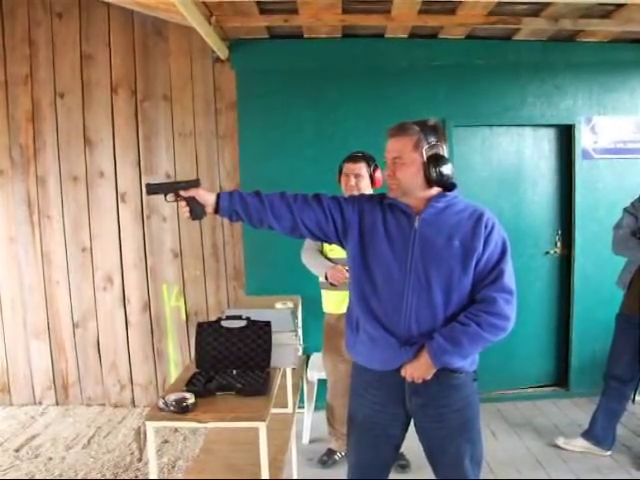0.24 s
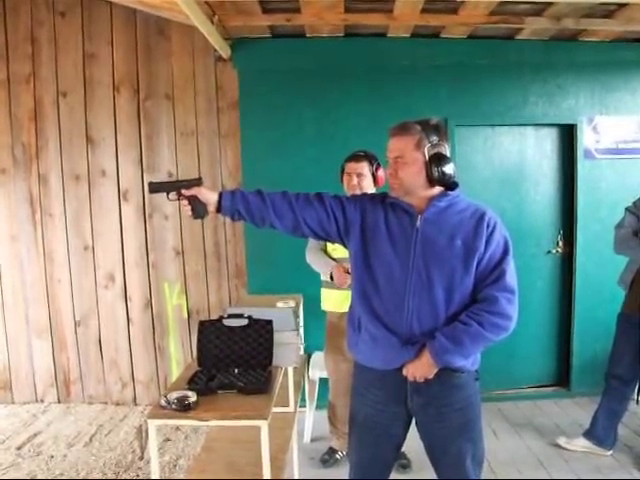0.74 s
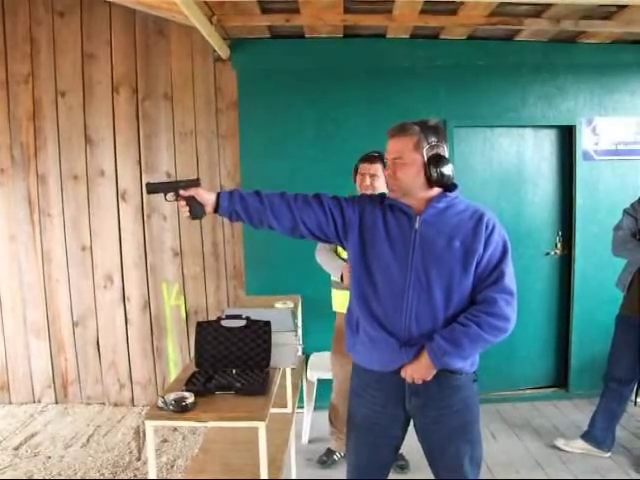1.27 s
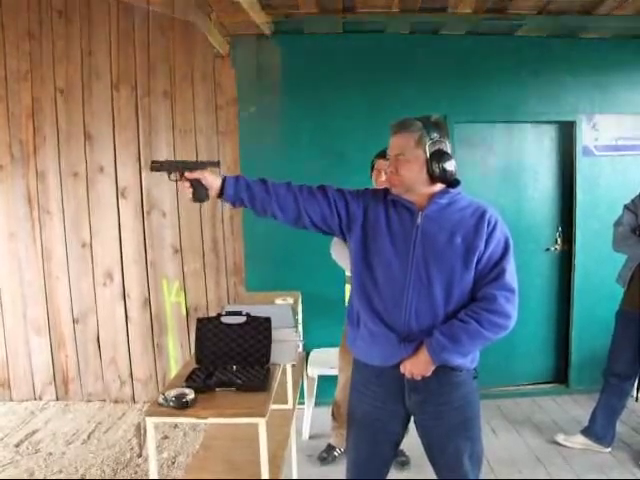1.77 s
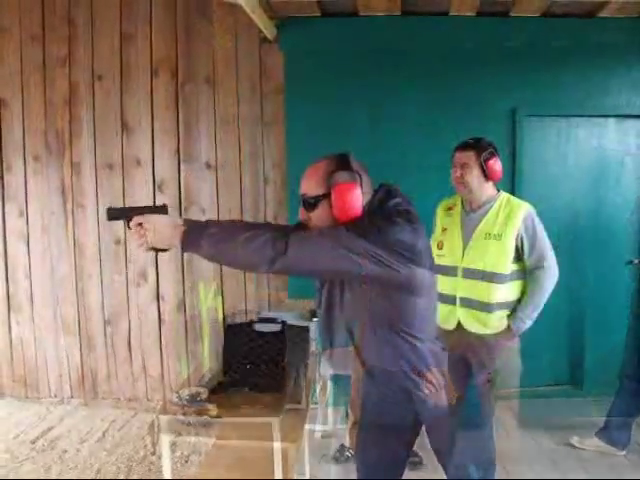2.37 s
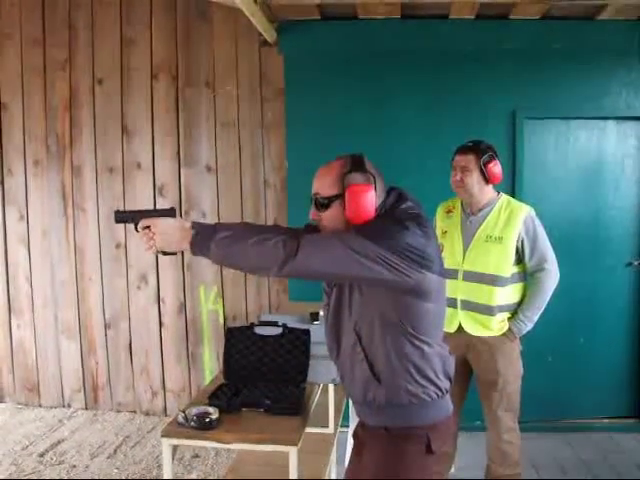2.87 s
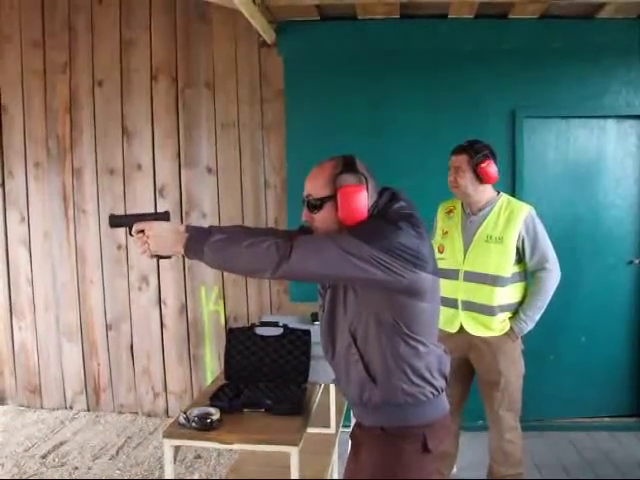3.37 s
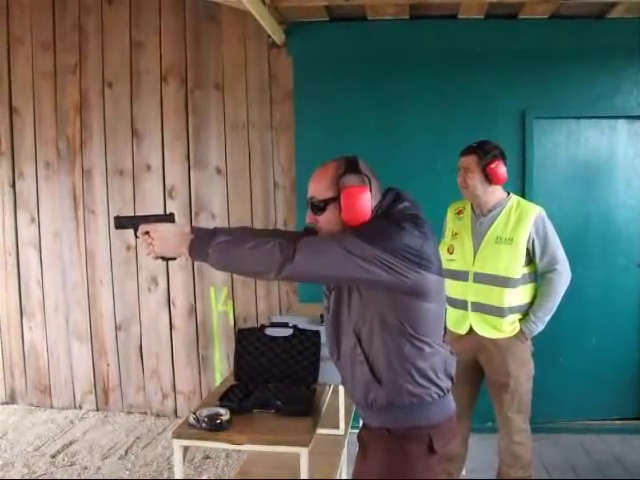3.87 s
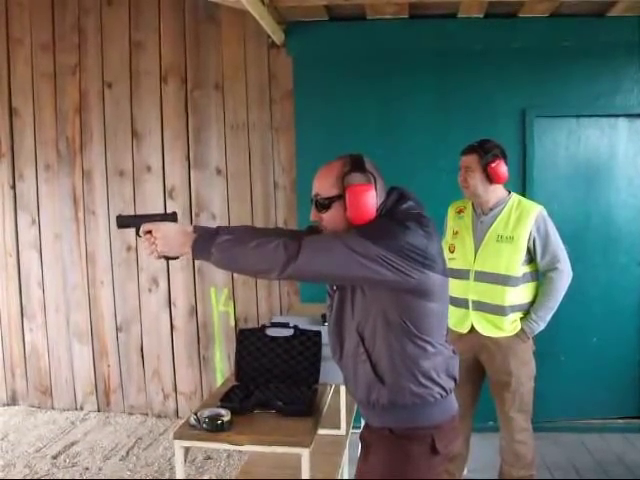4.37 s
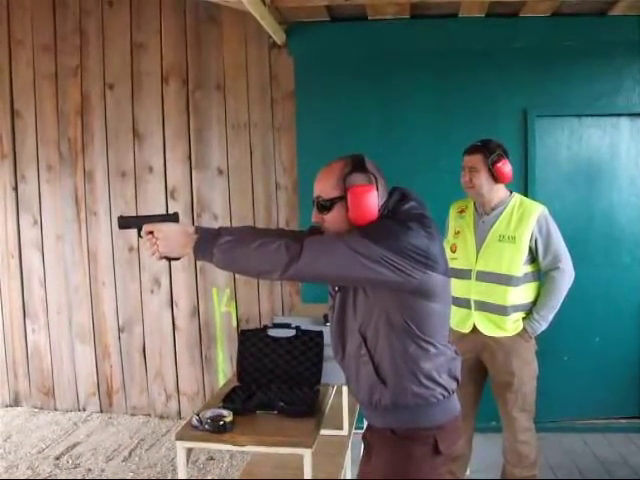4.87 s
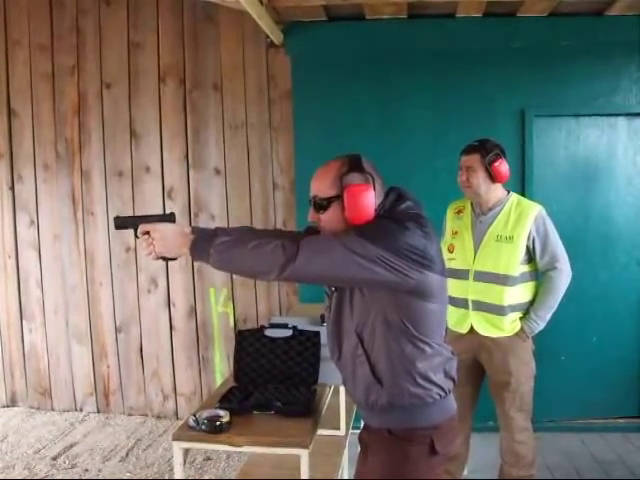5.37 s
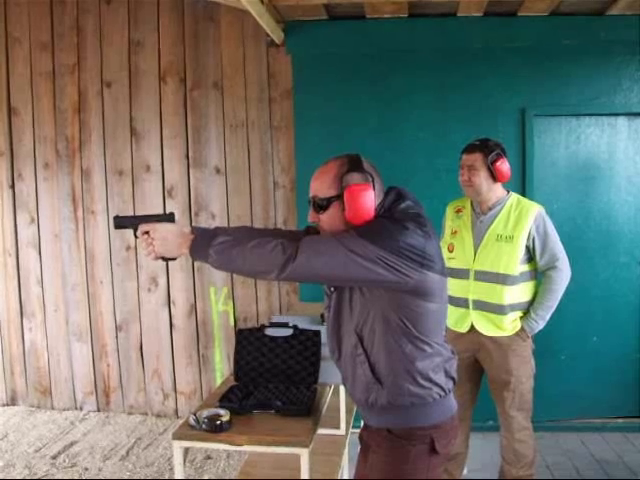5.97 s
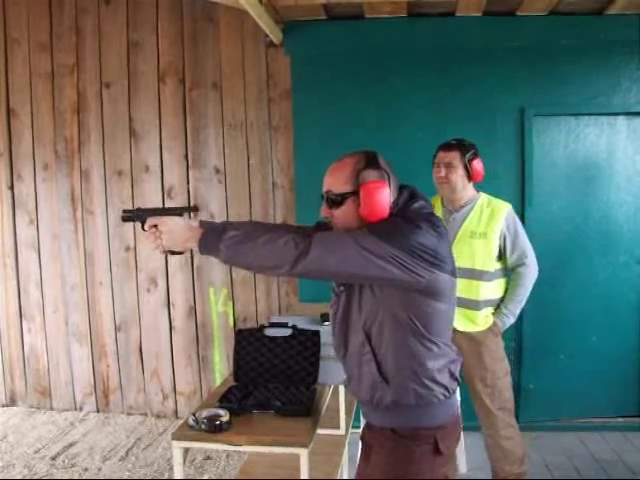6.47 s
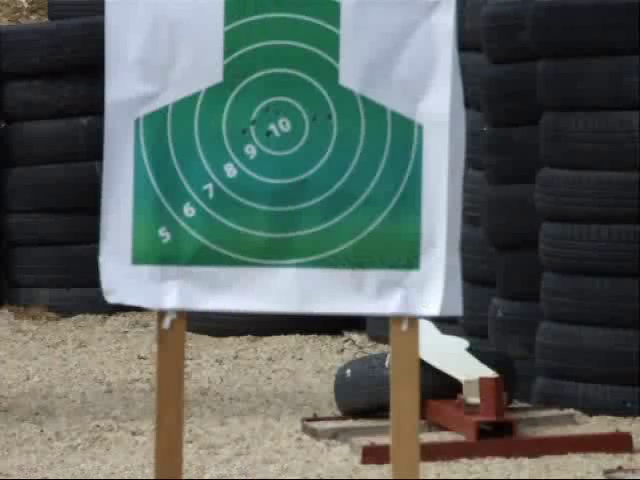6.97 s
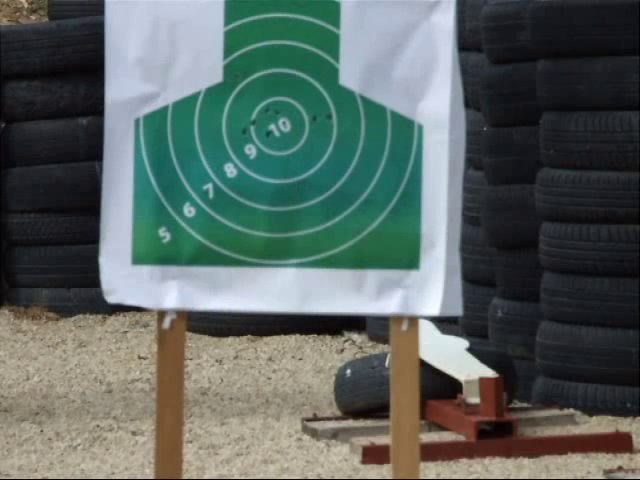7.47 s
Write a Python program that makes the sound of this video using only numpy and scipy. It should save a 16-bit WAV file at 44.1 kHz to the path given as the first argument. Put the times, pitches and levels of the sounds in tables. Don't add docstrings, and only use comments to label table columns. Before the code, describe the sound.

A small bare microphone in an open-fronted wooden booth catches rumbling, fluttering wind. A knock on wood sounds at the start, a clear click near 0.15 s, and heavier gusts thump around 1.3 to 1.5 s. A dull far shot at 1.6 s precedes the first close pistol blast at 1.77 s, hard and distorted, with bright booth reverberation and a duller return from far banks. A quick pair follows at 2.43 and 2.67 s. As the echo fades, a faint steady metallic ring emerges, with distant knocks from 3.2 to 3.9 s. The loudest crack comes at 4.05 s, leaving another steely ring, wind and small brass clicks between 4.7 and 5.6 s. A last quick pair bursts at 6.14 and 6.39 s, echoing away until the sound cuts abruptly near 6.97 s, leaving near-silence. The treble is gritty throughout.

```python
import sys
import numpy as np
from scipy import signal
from scipy.io import wavfile
from scipy.ndimage import uniform_filter1d, map_coordinates

SR = 44100
rng = np.random.default_rng(int(sys.argv[2]) if len(sys.argv) > 2 else 0)


def transcribe(u):
    v = np.clip(np.atleast_2d(u).T, -1, 1)
    q = np.round(v * 32767).astype(np.int16)
    wavfile.write(sys.argv[1], SR, q)


def decibels_to_gain(level_db):
    exponent = np.asarray(level_db, float) / 20
    return 10 ** exponent


N = 341334

# time_s, rumble_db
BREEZE = [(0, -45), (.5, -53), (.88, -43.5), (.97, -36.5), (1.5, -29.5), (1.75, -41.5), (2.2, -44),
          (2.4, -43.5), (2.9, -43.5), (3.4, -52.5), (3.65, -46), (4.25, -40.5), (4.7, -35), (4.95, -46.5),
          (5.35, -36.5), (5.65, -49.5), (6.05, -52.5), (6.8, -48)]
# middle_s, half_length_s, rumble_db, buffeting_db
GUST_EVENTS = [(.02, 0.032, -41, -43), (0.23, 0.042, -38.5, -47), (0.432, 0.094, -39, -49.5),
               (.692, 0.083, -41, -46), (0.786, .028, -29, -24), (0.99, .05, -27, -36),
               (1.147, 0.061, -30.5, -45), (1.282, 0.023, -23, -23.5), (1.323, 0.066, -31, -20.5),
               (1.473, 0.11, -27, -27), (1.607, .025, -28, -23), (2.152, 0.028, -36, -45),
               (2.905, 0.026, -44, -31), (3.742, 0.027, -28, -32), (3.922, 0.014, -33.5, -36.5),
               (4.55, .04, -40.5, -39), (4.658, .045, -28.5, -33.5), (4.735, .028, -29, -23),
               (4.821, .04, -29.5, -36.5), (5.091, 0.024, -31, -35.5), (5.187, 0.037, -34, -38),
               (5.247, 0.02, -30, -45), (5.357, 0.17, -40, -34), (6.133, 0.036, -37.5, -49),
               (6.69, 0.036, -42.5, -34.5), (6.819, .1, -53.5, -32.5)]
# frequency_hz, density_db (per Hz)
RUMBLE_SPECTRUM = [(10, -12), (30, -5.5), (70, 6), (130, -7.5), (250, -23)]
# frequency_hz, density_db (per Hz)
BUFFET_SPECTRUM = [(60, -16.5), (140, 9.5), (300, 0), (600, -14.5), (1200, -96), (2000, -59.5)]

# start_s, booth_db, return_db, extra_brightness_db, knee_s (time
EXCITATIONS = [
    (-0.03, -15, -27, -1, 0.23),
    (1.606, -11.5, -10.5, -2.6, 0.077),
    (1.771, -1, -3, 0.1, 0.37),
    (2.427, -4, -4.5, 0.6, 0.54),
    (2.6745, -1.4, -0.7, 0.7, 0.5),
    (3.82, -20, -18.5, -2.5, 0.064),
    (4.049, 0.35, 2, 0.34, 0.38),
    (6.145, 0.2, 1.5, 0.7, 0.36),
    (6.394, -0.7, -0.24, 1, 0.44),
]
# frequency_hz, density_db (per Hz)
BANK_SPECTRUM = [(350, -46), (600, -9), (800, -3), (1150, 1.5), (1680, -5.5), (2300, -6), (2900, -17),
                 (4500, -21.5)]
# frequency_hz, density_db (per Hz)
AIR_SPECTRUM = [(1200, -20.5), (2400, -3.5), (3000, -2.5), (4300, -0.5), (5300, 1.5), (6500, 1.5),
                (8000, -2), (10000, 4)]
# frequency_hz, density_db (per Hz)
BODY_SPECTRUM = [(60, -9), (150, 1), (200, 0), (300, -1.5), (550, 0.5), (800, -2.5), (1200, -28.5)]
# level_db, t60_s
BOOTH_DECAY = [
    (-18, 0.41),
    (-13, 0.27),
    (-21, .45),
]
# level_db, loss_db_per_s, late_loss_db_per_s (added after the knee of each blast)
RANGE_DECAY = [
    (-14.5, 7.2, 42),
    (-9.5, 43.9, 53),
    (-14.5, 48, 180),
]
STILL_AIR_DB = [-55, -50.5, -55]
# time_s, change_db
STILL_AIR_CHANGE = [(0, -1.5), (.5, -0.5), (1.2, -0.3), (1.5, 2), (3.5, 10.5), (5.2, 2.5), (6.1, 5)]

# start_s, tick_db, wood_db, mid_db, brass_db
KNOCK_EVENTS = [(0.001, -60, -20, -27.5, -28.5), (0.1589, -11.5, -18.5, -16, -30),
                (0.4044, -39.5, -41, -46.5, -56), (0.6952, -30.5, -23, -35, -35),
                (0.752, -37, -32, -55, -44), (0.7791, -33.5, -37, -44.5, -39),
                (1.593, -24, -17.5, -40.5, -29), (3.239, -8, -6.5, -32, -25.5),
                (3.4342, -10.5, -3, -34, -21.5), (3.5088, -6, -11.5, -28, -28),
                (3.7273, -15.5, -10, -17.5, -19.5), (3.8144, -2.5, -8.5, -14.5, -5.5),
                (3.9221, -20.5, -20.5, -21, -16), (5.3435, -24, -34, -42, -34.5),
                (5.7293, -30, -30.5, -36, -30)]
# start_s, tick_db, mid_db, brass_db
CASE_EVENTS = [
    (0.1534, -11, -18.5, -12),
    (1.3095, -18.5, -34, -23.5),
    (1.6046, -3.5, -20, -24),
    (4.6998, -30, -45, -25),
    (4.8387, -3.5, -33.5, -7),
    (5.1078, -26, -50.5, -42),
    (5.2924, -25.5, -36, -31),
    (5.393, -10.5, -28.5, -14.5),
    (5.6427, -10, -37.5, -17),
]
# frequency_hz, width_hz, level_db
WOOD_MODES = [(1270, 850, 7.5), (1700, 1700, 5.5), (2460, 1620, 5.5)]
# frequency_hz, width_hz, level_db
MID_MODES = [(3410, 1700, 8), (3700, 2540, 6.5)]
# frequency_hz, width_hz, level_db
BRASS_MODES = [(5220, 580, 13), (6000, 2300, 6), (8100, 7200, 3.5)]

# middle_s, length_s, level_db, frequency_hz, width_hz
SWISH_EVENTS = [(0.885, 0.14, -40.5, 1525, 1595), (1.445, 0.055, -44, 5000, 4020),
                (1.661, 0.14, -27, 1486, 592), (1.68, .17, -32.5, 2320, 692),
                (5.75, 0.06, -38.5, 2230, 497), (2.356, 0.14, -37, 6400, 3000),
                (3.667, 0.096, -30, 6740, 3630), (5.77, 0.095, -35, 6000, 3410),
                (3.283, .11, -34, 423, 110), (3.46, .055, -34, 410, 90), (3.57, .05, -35, 330, 300),
                (4.715, .07, -32.5, 7010, 3500), (1.316, .018, -20, 7900, 2000),
                (3.535, .06, -26.5, 2500, 2200), (4.2, .06, -34, 500, 250), (1.6, .03, -24.5, 700, 660),
                (.19, .07, -31, 1500, 900), (.3, .5, -56, 765, 12)]
# start_s, peak_db
SLAP_EVENTS = [(0.775, -29), (0.986, -45), (1.11, -48), (1.274, -32.5), (1.296, -16), (1.314, -18),
               (1.415, -20.5), (1.434, -25.5), (1.488, -23.5), (1.508, -29.5), (3.744, -25.5),
               (3.813, -20.5), (4.67, -31), (4.723, -24), (4.809, -37.5), (5.085, -53), (5.184, -40.5),
               (5.307, -31.5), (5.369, -32), (5.408, -33)]

# start_s, blast_db, leak_db (gas escaping just before)
SHOT_EVENTS = [
    (1.7686, 5, 3),
    (2.4252, -1, 2),
    (2.6725, 0, -25),
    (4.0475, 15.5, 4),
    (6.1429, 3, 0),
    (6.3926, 0, -22),
]
# lag_s (after the blast), sag_db, sag_length_s, lingering_sag_db
SHOT_OVERLOADS = [
    (.0006, -9, .020, -16.5),
    (.0007, -7.5, .030, -29),
    (.0005, -3.5, .021, -18.5),
    (.0014, -2, .023, -45),
    (.001, -7.5, .028, -19.5),
    (.0009, -5, .016, -12.5),
]
# frequency_hz, highest_swing_s, level_db
SHOT_WOBBLES = [
    (60, .049, -21),
    (47, .048, -16),
    (41, .0405, -12),
    (32, .049, -15),
    (62, .038, -11.5),
    (49, .0436, -11.5),
]

# start_s, level_db, loss_db_per_s, ducked_s (when a later bang ducks it)
SHEET_RINGS = [
    (2.676, -27.5, 11, 3.74),
    (4.046, -28, 15.5, 8),
]
# frequency_hz, level_db
SHEET_PARTNERS = [(743, -19), (1254, -15), (980, -14.5)]


def evened(x):
    return x / np.sqrt(np.mean(x ** 2) + 1e-20)


def add(mix, s, sound):
    part = mix[round(s * SR):][:len(sound)]
    part += sound[:len(part)]


def curve(points):
    return np.interp(np.arange(N) / SR, *np.transpose(points))


def flicker(seconds):
    width = max(round(seconds * SR), 1)
    once = uniform_filter1d(rng.standard_normal(N), width)
    return evened(uniform_filter1d(once, width))


def noise(points, patchy_db, flicker_db, flicker_s):
    frames, hz = N // 256 + 5, np.fft.rfftfreq(1024, 1 / SR)
    real, imaginary, patches = rng.standard_normal((frames, 513, 3)).T
    patches = evened(uniform_filter1d(uniform_filter1d(patches, size=8, axis=0), size=8, axis=1))
    f, db = np.transpose(points)
    colour_db = np.interp(np.log(hz + 1), np.log(f + 1), db, left=-90, right=-90)
    spectrum = (real + 1j * imaginary) * decibels_to_gain(colour_db[:, None] + patchy_db * patches)
    x = signal.istft(spectrum, nperseg=1024, noverlap=768)[1][:N]
    return evened(x * decibels_to_gain(flicker_db * flicker(flicker_s)))


def resonate(x, modes):
    out = np.zeros(len(x))
    for k, (hz, width, db) in enumerate(modes):
        b, a = signal.iirpeak(hz, hz / width, SR)
        twice = signal.lfilter(b, a, signal.lfilter(b, a, x))
        out += (-1) ** k * decibels_to_gain(db) * twice
    return out


def wind():
    breeze_db = curve(BREEZE)
    rumble, buffet = decibels_to_gain(breeze_db), decibels_to_gain(4.5 + 1.28 * breeze_db)
    for s, half_s, rumble_db, buffet_db in GUST_EVENTS:
        bump = np.hanning(round(2.17 * half_s * SR))
        add(rumble, max(s - 1.3 * half_s, 0), decibels_to_gain(rumble_db) * bump)
        add(buffet, max(s - 0.99 * half_s, 0), decibels_to_gain(buffet_db) * bump)
    rumble = rumble * noise(RUMBLE_SPECTRUM, patchy_db=2.0, flicker_db=1.0, flicker_s=0.034)
    return rumble + buffet * noise(BUFFET_SPECTRUM, patchy_db=1.5, flicker_db=4.0, flicker_s=0.0064)


def field(index):
    hold_s = .025
    flash_db, flash_t60_s = -10, .012
    gain_drop_db, recovery_db_per_s = 16, 38.5
    t = np.arange(0, N + 32, 32) / SR
    (booth_db, t60_s), (back_db, loss, late_loss) = BOOTH_DECAY[index], RANGE_DECAY[index]
    near, far, duck_db = 0 * t, 0 * t, 0 * t
    for s, db, return_db, bright_db, knee_s in EXCITATIONS:
        since, on = np.maximum(t - s, 0), t >= s
        tilt_db = bright_db * (index > 0)
        decay_db = 60 * np.maximum(since - hold_s, 0) / t60_s
        near += on * decibels_to_gain(2 * (db + tilt_db + booth_db - decay_db))
        near += on * (index == 1) * decibels_to_gain(2 * (db + flash_db - 60 * since / flash_t60_s))
        lost_db = loss * since + late_loss * np.maximum(since - knee_s, 0)
        far += on * decibels_to_gain(2 * (return_db + tilt_db + back_db - lost_db))
        duck_db = np.maximum(duck_db, on * (gain_drop_db + db - recovery_db_per_s * since))
    level = np.sqrt(near + far * decibels_to_gain(-2 * duck_db))
    still_air = decibels_to_gain(STILL_AIR_DB[index] + curve(STILL_AIR_CHANGE))
    return np.hypot(np.interp(np.arange(N) / SR, t, level), still_air)


def echoes():
    banks = field(index=0) * noise(BANK_SPECTRUM, patchy_db=1.48, flicker_db=0.75, flicker_s=0.0026)
    air = field(index=1) * noise(AIR_SPECTRUM, patchy_db=-1.64, flicker_db=0.85, flicker_s=0.0016)
    body = field(index=2) * noise(BODY_SPECTRUM, patchy_db=0.5, flicker_db=-0.5, flicker_s=0.013)
    return banks + air + body


def click(tick_db, wood_db, mid_db, brass_db, t60_s):
    t = np.arange(round(.4 * SR)) / SR
    draws = rng.standard_normal((len(t), 2))
    shower = draws[:, 0] * decibels_to_gain(4 * uniform_filter1d(draws[:, 1], size=30))
    near = np.exp(-(t / 0.0081) ** 4)
    booth = decibels_to_gain(-60 * t / max(t60_s, .03))

    knock = decibels_to_gain(wood_db - 11.0) * evened(resonate(shower, WOOD_MODES))
    knock += decibels_to_gain(mid_db - 10.0) * evened(resonate(shower, MID_MODES))
    knock = knock * np.minimum(t / 0.00032, 1) * (near + 1.04 * booth)

    brass = decibels_to_gain(brass_db + 2.5) * evened(resonate(shower, BRASS_MODES))
    brass = brass * (1 - np.exp(-(t / .004) ** 2)) * (0.41 * near + 0.24 * booth)

    spin = 1.3 * np.sin(2 * np.pi * 70 * t)
    ring = decibels_to_gain(brass_db - 25 - 60 * t / 0.51) * np.sin(2 * np.pi * 5350 * t + spin)
    ring = ring * (1 - np.exp(-t / .004))

    from_peak = t - .0013
    tick = decibels_to_gain(tick_db) * np.exp(-(from_peak / .00026) ** 2) * np.cos(2 * np.pi * 6900 * from_peak)
    return knock + brass + ring + tick


def clicks():
    out = np.zeros(N)
    for s, tick_db, mid_db, brass_db in CASE_EVENTS:
        add(out, s, click(tick_db, brass_db - 28.5, mid_db, brass_db, t60_s=0.31))
    for s, *levels_db in KNOCK_EVENTS:
        add(out, s, click(*levels_db, t60_s=0.29))
    return out


def swishes():
    out = np.zeros(N)
    for s, length_s, db, hz, width in SWISH_EVENTS:
        hiss = resonate(rng.standard_normal(round(.6 * SR)), [(hz, width, 0)])
        hiss = hiss[:round(length_s * SR)]
        add(out, s - length_s / 2, decibels_to_gain(db) * evened(hiss) * np.hanning(len(hiss)))
    return out


def slaps():
    out, t = np.zeros(N), np.arange(round(.08 * SR)) / SR
    shape = (t / .007) * np.exp(1 - t / .007)
    band = signal.butter(4, [110, 840], "band", fs=SR, output="sos")
    for s, db in SLAP_EVENTS:
        puff = signal.sosfilt(band, rng.standard_normal(len(t)))
        add(out, s, decibels_to_gain(db - 8.0) * evened(puff) * shape)
    return out


def blast(s, db, leak_db):
    lead_s = .0036
    t = np.arange(round(.03 * SR)) / SR
    late = np.maximum(t - lead_s, 0)
    leak = decibels_to_gain(leak_db - 5 - 60 * (t / .0075) ** 2)
    crack = decibels_to_gain(db + 9 - 60 * (late / .0055) ** 2) * (t >= lead_s)
    hiss = uniform_filter1d(rng.standard_normal(len(t)), size=2)
    hiss = signal.lfilter([1, -.6], 1, hiss)
    return s - lead_s, (leak + crack) * evened(hiss)


def sag(db, length_s, linger_db, wobble_hz, swing_s, wobble_db):
    t = np.arange(round(.8 * SR)) / SR
    pull = decibels_to_gain(db) / (1 + np.exp((t - length_s) / .003))
    pull += decibels_to_gain(linger_db) / (1 + np.exp((t - .080) / .0054))
    from_swing = t - swing_s
    swing = np.tanh(1.8 * np.cos(2 * np.pi * wobble_hz * from_swing))
    wobble = decibels_to_gain(wobble_db) * swing * .9 * np.exp(-(from_swing / .024) ** 4)
    b, a = signal.butter(2, 2.67, "high", fs=SR)
    onset = 1 - np.exp(-t / 0.0017)
    return decibels_to_gain(0.3) * signal.lfilter(b, a, (wobble - pull) * onset)


def shots():
    out = np.zeros(N)
    for (s, db, leak_db), (lag_s, *overload), wobble in zip(SHOT_EVENTS, SHOT_OVERLOADS, SHOT_WOBBLES):
        add(out, *blast(s, db, leak_db))
        add(out, s + lag_s, sag(*overload, *wobble))
    return out


def sheet():
    emerge_s, ducked_db_per_s = 0.42, 111.5
    t, level = np.arange(N) / SR, np.zeros(N)
    for s, db, loss, ducked_s in SHEET_RINGS:
        since = np.maximum(t - s, 0)
        rise = 1 - np.exp(-(since / emerge_s) ** 4)
        ducking_db = ducked_db_per_s * np.maximum(t - ducked_s, 0)
        level += rise * decibels_to_gain(db - loss * since - ducking_db)
    modes = np.sin(2 * np.pi * 946.5 * t)
    for hz, db in SHEET_PARTNERS:
        modes += decibels_to_gain(db + 2.5 * flicker(0.13)) * np.sin(2 * np.pi * hz * t)
    return np.sqrt(2) * level * decibels_to_gain(1.2 * flicker(.05)) * modes


def scene():
    mix = shots() + echoes() + clicks() + swishes() + sheet() + wind() + slaps()
    return mix[None]


def top_cut(x):
    return signal.sosfilt(signal.butter(12, 15850, fs=SR, output="sos"), x)


def record(dry):
    hold_hz, stop_s = 16001.3, 6.9685
    t = np.arange(N) / SR
    b, a = signal.butter(8, 8300, fs=SR)
    base = signal.lfilter(b, a, np.clip(dry[0], -.95, .95))
    places = np.arange(int(t[-1] * hold_hz) + 1) / hold_hz * SR
    samples = np.clip(map_coordinates(base, [places], order=3), -1, 1)
    held = samples[(t * hold_hz).astype(int)]
    after = decibels_to_gain(-23.5 - 60 * (np.maximum(t - stop_s, 0) / 0.086) ** 2)
    mix = held[None] * np.where(t < stop_s, 1, after)
    return top_cut(mix)


dry = scene()
out = record(dry)
transcribe(out)
```